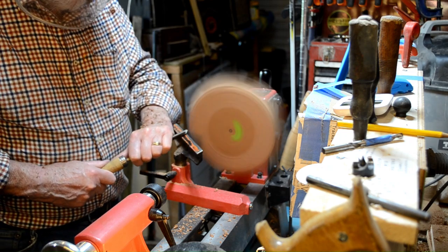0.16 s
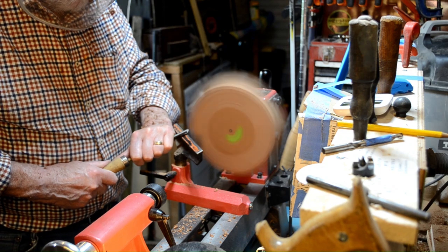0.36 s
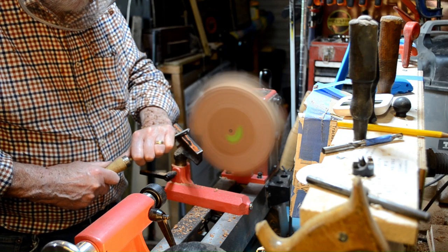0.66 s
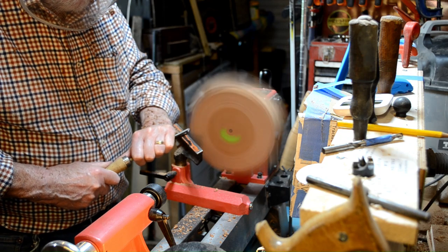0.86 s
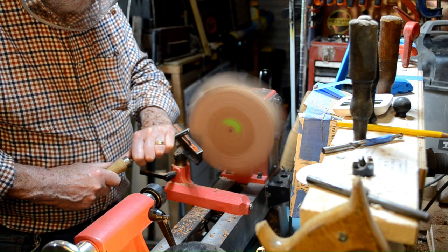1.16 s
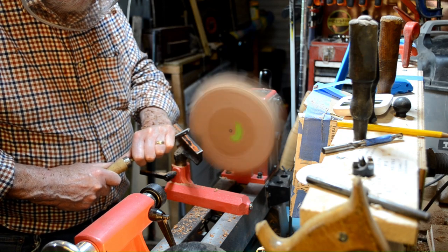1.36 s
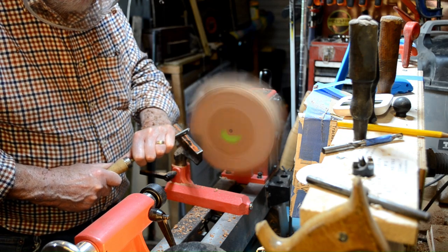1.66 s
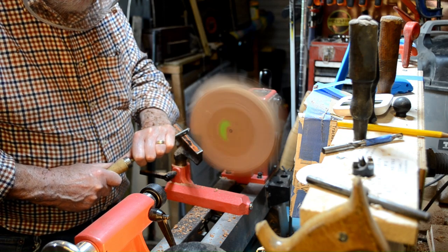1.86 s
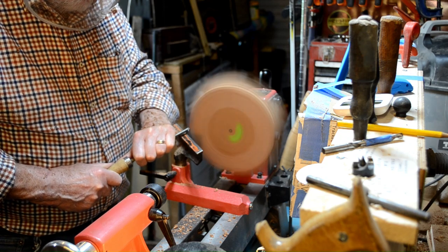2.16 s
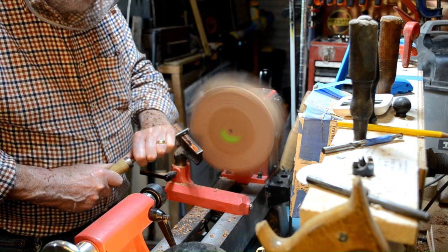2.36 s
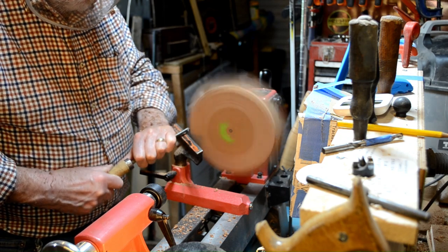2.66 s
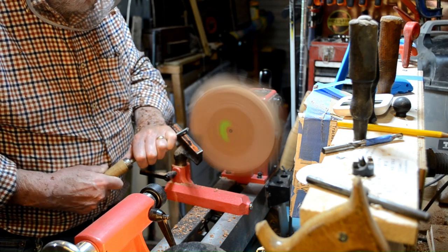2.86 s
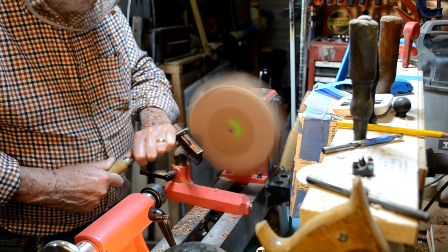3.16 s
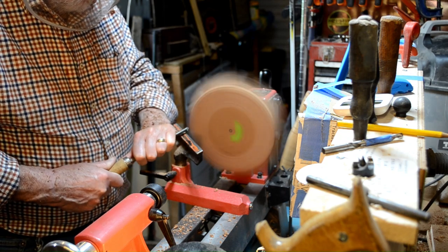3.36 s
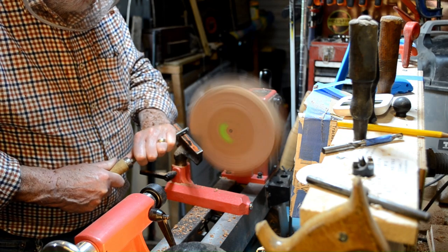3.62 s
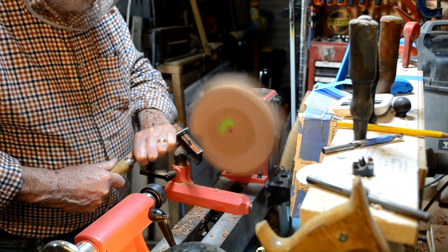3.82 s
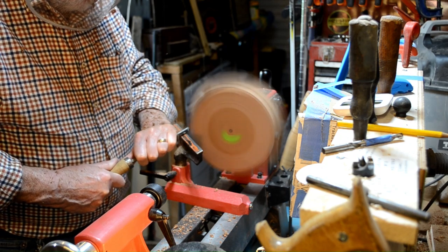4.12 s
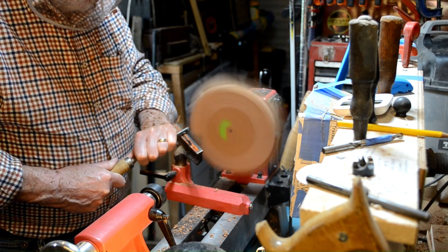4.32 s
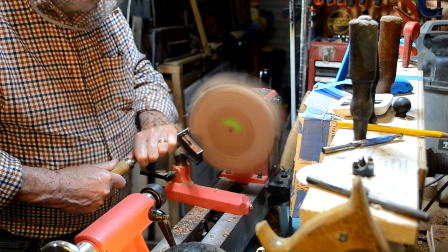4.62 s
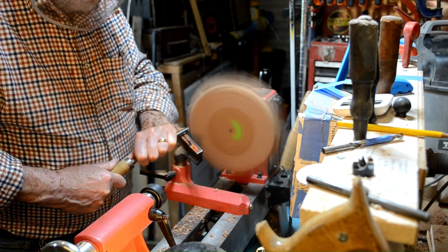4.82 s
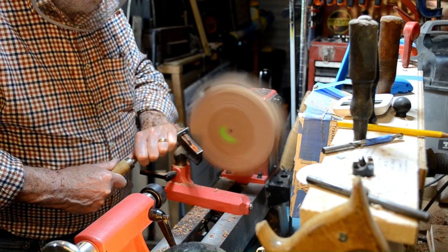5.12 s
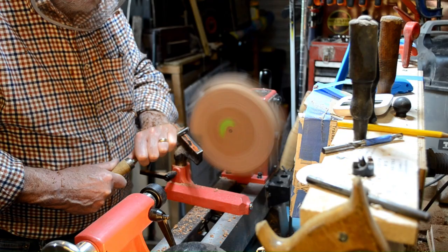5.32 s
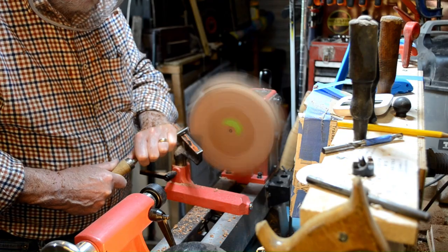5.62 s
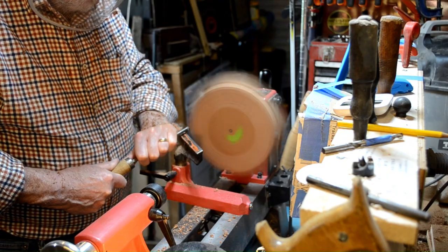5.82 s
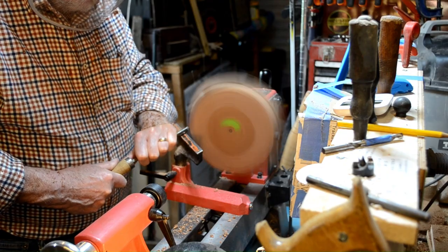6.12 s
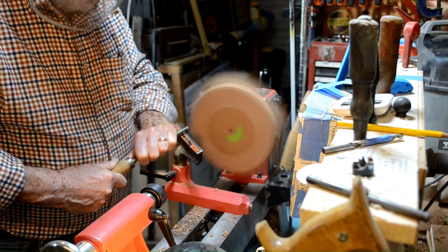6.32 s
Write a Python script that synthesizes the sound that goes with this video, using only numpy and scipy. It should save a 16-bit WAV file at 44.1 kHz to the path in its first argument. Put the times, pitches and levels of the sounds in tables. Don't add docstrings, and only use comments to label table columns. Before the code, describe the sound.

A lathe motor idles for the first 0.7 seconds: a steady, slightly wavering electric whine with high overtones, throbbing about nine times a second over airy belt and bearing hum. From 0.7 the gouge touches, hesitant at first, then a rough rattling chatter of about thirty-five uneven knocks a second, each a dry woody rip with a brief steel ring and a hollow thump of the rest; the bench rumbles beneath and the motor pitch sags. At 2.6 it lifts and the whine rises. Just before 3.0 the edge snags and slams, a single hard clank. Faint ticks from 3.3 grow into full cutting by 3.8. Around 4.6 bites drop out, a loud knot cracks at 4.7, and the motor surges. From 4.9 cutting returns, growing heavier and louder until the end at about 6.5. Close microphone, short workshop echo, slight overload on peaks.

```python
import sys
import numpy as np
from scipy import signal
from scipy.fft import rfft, irfft, next_fast_len
from scipy.io import wavfile
from scipy.ndimage import uniform_filter1d

SR = 44100
rng = np.random.default_rng(int(sys.argv[2]) if len(sys.argv) > 2 else 0)


def waveform_to_disk(signal):
    frames = np.transpose(np.atleast_2d(signal))
    scaled = np.clip(frames, -1, 1) * 32767
    samples = np.round(scaled).astype(np.int16)
    wavfile.write(sys.argv[1], SR, samples)


def attenuation_scalar(level_db):
    decades = np.asarray(level_db, float) / 20
    return 10 ** decades


N = 285723


def evened(x):
    return x / np.sqrt(np.mean(x ** 2) + 1e-20)


def read(points, hz):
    f, value = np.transpose(points)
    return np.interp(np.log(hz + 1), np.log(f + 1), value)


def coloured(points):
    size = next_fast_len(N)
    spectrum = rfft(rng.standard_normal(size))
    shape = attenuation_scalar(read(points, np.fft.rfftfreq(size, 1 / SR)))
    return evened(irfft(spectrum * shape, size)[:N])


def drift(seconds):
    step = max(int(seconds * SR / 8), 1)
    coarse = rng.standard_normal(N // step + 2)
    coarse = uniform_filter1d(uniform_filter1d(coarse, size=8), size=8)
    return evened(np.interp(np.arange(N) / step, np.arange(len(coarse)), coarse))


def resonate(x, hz, width_hz):
    pole = np.exp((2j * np.pi * hz - np.pi * width_hz) / SR)
    return 2 * signal.lfilter([1 - abs(pole)], [1, -pole], x).real


def dulled(x):
    return signal.sosfilt(signal.butter(4, 9500, fs=SR, output="sos"), x)


def ragged(x, patchy_db):
    z = signal.stft(x, nperseg=256)[2]
    patches = uniform_filter1d(rng.standard_normal(z.shape), size=4, axis=0)
    patches = evened(uniform_filter1d(patches, size=4, axis=1))
    return signal.istft(z * attenuation_scalar(patchy_db * patches), nperseg=256)[1][:N]


def envelope(bites, level_db, lag_ms, fall_ms, hold_ms=0.):
    t_ms = np.arange(SR // 7) / SR * 1000
    power = np.zeros(N + len(t_ms))
    for (s, *_, entry_ms), db in zip(bites, level_db):
        contact_ms = 3.92 + 2.27 * entry_ms + hold_ms
        swell = 1 - np.exp(-(t_ms / (entry_ms + lag_ms)) ** 1.62)
        fade = np.exp(-np.maximum(t_ms - contact_ms, 0) / fall_ms - t_ms / (3 * contact_ms))
        touch_s = s - 1.21 * entry_ms / 1000
        power[round(touch_s * SR):][:len(t_ms)] += (attenuation_scalar(db) * swell * fade) ** 2
    return np.sqrt(power[:N])


# f/Hz, t60/s
SHOP_T60 = [(100, 0.79), (300, 0.35), (1000, 0.2), (4000, 0.15), (12000, 0.12)]


def shop(x):
    taps = np.zeros(SR // 2)
    at = np.arange(200, SR // 2 - 20, 20)
    taps[at + rng.integers(0, 20, len(at))] = rng.choice([-1., 1.], len(at))
    hz, t, z = signal.stft(taps, SR, nperseg=256)
    decay = attenuation_scalar(-60 * t / read(SHOP_T60, hz)[:, None])
    tail = signal.istft(z * decay, SR, nperseg=256)[1]
    return signal.fftconvolve(x, tail / np.linalg.norm(tail))[:N]


# t/s, f/Hz
MOTOR_HZ = [(0, 662), (.7, 663), (1.1, 640), (2.55, 635), (2.68, 680), (2.75, 684), (2.98, 670),
            (3.03, 640), (3.18, 666), (3.3, 668), (3.6, 655), (3.78, 660), (4.0, 625), (4.72, 625),
            (4.84, 680), (4.93, 692), (5.1, 640), (6.48, 635)]
WHINE_ORDERS = [1.5, 6.935, *range(1, 17)]
WHINE_LEVELS_DB = [-57, -58, -62.5, -56.5, -62.5, -65, -76, -63.5, -52, -56, -64, -55, -71, -73, -88.5, -74,
                   -75, -81]
# f/Hz, density/dB per Hz
HUM_SPECTRUM = [(30, 1), (100, -5), (160, -13), (280, 4), (450, -12), (1000, -1), (1500, -7), (2500, -11),
                (3500, -17.5), (4700, -9.5), (6200, -15), (7500, -11), (8500, -22.5), (11000, -32)]


def motor():
    t = np.arange(N) / SR
    spindle_hz, idle_hz, db_per_hz = 9.6, 662, 0.16
    hz = uniform_filter1d(np.interp(t, *np.transpose(MOTOR_HZ)), 1500)
    turns = np.cumsum(hz * (1 + 0.0009 * drift(0.017))) / SR
    whine = np.zeros(N)
    for order, order_db in zip(WHINE_ORDERS, WHINE_LEVELS_DB):
        throb_db = 1.5 * np.sin(2 * np.pi * (spindle_hz * t + rng.random()))
        level = attenuation_scalar(order_db + throb_db + 1.2 * drift(0.03))
        if order in (1.5, 2):
            level = level * attenuation_scalar(4 * np.cos(2 * np.pi * spindle_hz * (t - 0.37)))
        sparking = 1 + 0.2 * drift(0.002)
        tone = np.sqrt(2) * np.sin(2 * np.pi * (order * turns + rng.random()))
        whine += level * sparking * tone
    hum = attenuation_scalar(-48.5 + 0.38 * drift(0.049)) * coloured(HUM_SPECTRUM)
    return attenuation_scalar(db_per_hz * (hz - idle_hz)) * whine + hum


# f/Hz, width/Hz, level/dB
BENCH = [(33, 7, -13), (54, 12, -13), (75, 12, 1), (100, 7, 2)]


def bench(bites):
    _, tear_db, rest_db, *_ = bites.T
    idle_db, settle_s, load_power = -63.5, 0.07, 1.07
    load_db = -23 + 2 * np.arange(N) / SR
    settle = np.exp(-1 / (settle_s * SR))
    load = envelope(bites, tear_db + rest_db, 10.2, 23.0) ** 2
    load = signal.lfilter([(1 - settle) ** 2], [1, -2 * settle, settle ** 2], load)
    push = envelope(bites, 0.2 * tear_db, 1.35, 2.3)
    push = (push - uniform_filter1d(push, size=3000)) / (uniform_filter1d(push, size=9000) + 0.056)
    force = evened(push) + attenuation_scalar(16) * rng.standard_normal(N)
    shake = np.zeros(N)
    for hz, width_hz, db in BENCH:
        mode = resonate(resonate(force, hz, width_hz), hz, 3 * width_hz)
        shake += attenuation_scalar(db) * evened(mode)
    power = attenuation_scalar(2 * idle_db) + attenuation_scalar(2 * load_db) * abs(load) ** load_power
    return np.sqrt(power) * evened(shake)


# f/Hz, width/Hz, level/dB
REST_MODES = [(157.2, 9.6, -16), (305, 22, -10.5), (368, 34, -17), (473, 50, -8.5), (551, 20.6, -9.5),
              (575, 88, -40), (724, 60, -16.5), (1073, 38, -17), (1217, 79, -12), (1996, 88, -14)]


def rest(bites):
    drive = envelope(bites, bites[:, 1] + bites[:, 2], 0.8, 15)
    rings = np.zeros(N)
    for hz, width_hz, db in REST_MODES:
        mode = resonate(rng.standard_normal(N) * drive, hz, width_hz)
        rings += attenuation_scalar(db) * mode / np.sqrt(width_hz)
    return attenuation_scalar(33.5) * dulled(rings)


def rest_ring(bites):
    rest_hz, kick_rad = 266, 0.8
    wander = 0.017 * drift(0.03)
    swing = envelope(bites, bites[:, 1] + bites[:, 2], 10.5, 15.5, hold_ms=9.5)
    kicks = np.zeros(N)
    kicks[(bites[:, 0] * SR).astype(int)] = kick_rad * rng.standard_normal(len(bites))
    step = uniform_filter1d(np.cumsum(kicks), size=450)
    phase = 2 * np.pi * np.cumsum(rest_hz * (1 + wander)) / SR
    return attenuation_scalar(4.2) * swing * np.sin(phase + step)


# f/Hz, level/dB, t60/s
SLAM_MODES = [(262, -11, .25), (473, -22, 0.05), (588, -13.5, 0.05), (736, -22, 0.06), (954, -27.5, 0.12),
              (1890, -8.5, 0.033), (2100, -21, 0.018), (2770, -24, 0.032), (3940, -20, 0.026),
              (4450, -12.5, 0.019), (5530, -28, 0.035)]


def slam():
    t = np.maximum(np.arange(N) / SR - 2.9936, 0)
    blow = np.zeros(N)
    for hz, db, t60_s in SLAM_MODES:
        rise = 1 - np.exp(-t * hz / 0.6)
        blow += rise * attenuation_scalar(db - 60 * t / t60_s) * np.sin(2 * np.pi * (hz * t + rng.random()))
    return blow


# t/s, level/dB
HAND_LEAN = [(.7, -6), (1.0, -1.5), (1.4, 1.2), (1.8, -0.5), (2.2, -2.5), (2.55, 2), (3.3, -4.5),
             (3.6, -0.7), (3.9, -1), (4.25, 2), (4.6, 1), (4.8, -5.5), (5.1, -0.5), (5.4, -1.8),
             (5.7, -0.8), (5.95, -0.5), (6.25, -4), (6.48, 2.5)]


def bites_of(turns, corners):
    start, tear_db = np.array(turns)[:, :1], np.array(turns)[:, 1:]
    place, rest_db, ring_db, fizz_db = np.transpose(corners)
    last_turn_s, late_ms_per_db, pull_most_db = 0.111, 0.32, 6
    length = np.diff(start, axis=0, append=start[-1:] + last_turn_s)
    under_db = tear_db.max(axis=1, keepdims=True) - tear_db
    s = start + place * length + late_ms_per_db * np.minimum(under_db, 20) / 1000
    rest_db = np.minimum(rest_db + 0.37 * under_db, pull_most_db)
    rest_db = rest_db + np.interp(s, *np.transpose(HAND_LEAN))
    ring_db = np.minimum(ring_db + 0.36 * under_db, pull_most_db)
    fizz_db = fizz_db + 0.2 * (tear_db + 12)
    columns = np.broadcast_arrays(s, tear_db, rest_db, ring_db, fizz_db, 3.72)
    rows = np.stack(columns, axis=-1).reshape(-1, 6)
    return rows[rows[:, 0] < N / SR]


# t/s, tear level/dB of corners 1-4 (-60: misses)
FIRST_TURNS = [(.708, -20, -13, -20.5, -27.5), (.815, -34, -21, -13.5, -37), (.919, -25, -21, -7.5, -21),
               (1.033, -14.5, -17.5, -11.5, -18), (1.148, -18.5, -22, -14.5, -16.5),
               (1.260, -13, -17, -12, -15), (1.373, -12, -9.5, -11, -14), (1.491, -12.5, -12, -12.5, -15),
               (1.607, -10.5, -16, -13.5, -15), (1.721, -10.5, -12.5, -16, -23), (1.833, -10, -9, -8, -17),
               (1.948, -11.5, -16.5, -6, -16.5), (2.066, -9, -18.5, -13.5, -20),
               (2.181, -9, -17, -17, -16.5), (2.291, -18, -7, -33, -15), (2.404, -12, -7.5, -9, -23),
               (2.520, -16.5, -9, -14, -25)]
SECOND_TURNS = [(3.268, -58, -35, -30, -57), (3.374, -60, -33.5, -32, -60), (3.479, -49, -20.5, -13.5, -60),
                (3.586, -58, -11, -7, -60), (3.699, -60, -41, -24, -21.5), (3.803, -20.5, -17, -5.5, -18.5),
                (3.925, -10.5, -12, -5.5, -22), (4.043, -11, -12.5, -5.5, -17.5),
                (4.161, -14.5, -11.5, -8.5, -21), (4.274, -13.5, -17, -9, -18.5),
                (4.389, -14, -22.5, -5.5, -21), (4.506, -11, -28, -7, -10.5), (4.625, -60, -60, -60, -19),
                (4.741, -15.5, -42, -13.5, -27)]
THIRD_TURNS = [(4.847, -37, -27.5, -30, -22.5), (4.954, -14.5, -14, -42, -13.5),
               (5.062, -45, -18, -17, -13.5), (5.174, -12, -12, -42, -15),
               (5.286, -16.5, -12.5, -34, -16.5), (5.397, -13.5, -14, -6.5, -15.5),
               (5.514, -8, -10.5, -45, -26), (5.628, -25, -13, -7, -15), (5.740, -4, -18.5, -7, -19),
               (5.865, -10, -8, -23, -8.5), (5.983, -7, -9, -6.5, -23), (6.102, -9.5, -10.5, -5.5, -14),
               (6.221, -7, -11.5, -2.5, -17), (6.340, -6.5, -22, -5.5, -12), (6.458, -7.5, -60, -60, -60)]
# place/turn, rest, ring, fizz level/dB re tear
FIRST_GRAIN = [(0, -2.5, -11.5, -16), (.24, -7, -2.5, -28), (.505, -7.5, -9, -21.5), (.75, -1, -6, -19.5)]
SECOND_GRAIN = [(0, -4.5, -7.5, -18.5), (.24, -3, -0.5, -37), (.505, -6, -8, -20.5), (.75, 0.5, -5, -31)]
THIRD_GRAIN = [(0, -10, -11, -21.5), (.235, 0.5, 0.5, -31), (.505, -10, -11, -24.5), (.75, -3.5, -6.5, -29)]
# t/s, tear level/dB, rest, ring, fizz level/dB re tear
CATCH_BITES = [
    (2.9743, -20.5, 0, -1, -28),
    (2.9918, -9.5, 7, -1, -25),
]
KNOT_BITE = (4.685, -1.5, -11, -12, -16)


def all_bites():
    first = bites_of(FIRST_TURNS, FIRST_GRAIN)
    second = bites_of(SECOND_TURNS, SECOND_GRAIN)
    third = bites_of(THIRD_TURNS, THIRD_GRAIN)
    catch = [(*row, 0.57) for row in CATCH_BITES]
    knot = [(*KNOT_BITE, 3.72)]
    return np.vstack([first, second, third, catch, knot])


# f/Hz, density/dB per Hz
TEAR_SPECTRUM = [(100, -30.5), (200, -9.5), (350, -7), (900, -18.5), (2000, -12.5), (3500, -15.5),
                 (5000, -20), (7000, -35), (9000, -50), (12000, -70)]
# f/Hz, density/dB per Hz
FIZZ_SPECTRUM = [(3000, -17), (6000, 12), (8000, 2), (9500, -3), (11800, -1), (12700, -16), (14500, -8.5),
                 (15700, -31)]
# f/Hz, width/Hz, level/dB
GOUGE_MODES = [(1360.6, 32, 5.5), (1652, 89, -2.5), (1975, 146, -9.5), (2258, 36, -9), (2723, 12, -9),
               (2966, 10, -14.5), (3580, 57, -13.5), (4040, 75, -6.5), (4530, 330, -9.5), (4860, 117, -15),
               (5580, 390, -48), (5640, 11, -43), (5472, 74, -45.5), (6020, 52, -17), (6730, 110, -28),
               (8440, 16.7, -29), (8580, 22, -30), (9270, 74, -56.5)]


def gouge(bites):
    _, tear_db, _, ring_db, fizz_db, _ = bites.T
    clumps = attenuation_scalar(2.12 * drift(0.0015))
    tear = attenuation_scalar(-11.5) * coloured(TEAR_SPECTRUM) * envelope(bites, tear_db, 0.44, 6.8)
    fizz = attenuation_scalar(-1.5) * coloured(FIZZ_SPECTRUM) * envelope(bites, tear_db + fizz_db, -0.18, 11.5)
    low_drive = clumps * envelope(bites, tear_db + ring_db, 0.4, 12.4)
    high_drive = clumps * envelope(bites, tear_db, 0.8, 1.25)
    low, high = np.zeros(N), np.zeros(N)
    for hz, width_hz, db in GOUGE_MODES:
        is_low = hz < 1750
        drive, patchy_db = (low_drive, 1.8) if is_low else (high_drive, 3.6)
        grip = attenuation_scalar(db + patchy_db * drift(0.012))
        damped_hz = width_hz + hz / 60
        mode = resonate(rng.standard_normal(N) * drive * grip, hz, damped_hz) / np.sqrt(damped_hz)
        if is_low:
            low += mode
        else:
            high += mode
    chips = ragged(tear + fizz, patchy_db=3.2) * clumps
    return chips + dulled(attenuation_scalar(27) * low + attenuation_scalar(30) * ragged(high, patchy_db=2.2))


def scene():
    bites = all_bites()
    cutting = gouge(bites) + rest(bites) + slam()
    ring = rest_ring(bites)
    echoes = shop(attenuation_scalar(-4.5) * cutting + attenuation_scalar(-19) * ring)
    null = signal.iirnotch(124, 2.5, SR)
    heard = signal.lfilter(*null, cutting + ring + echoes)
    return (heard + bench(bites) + motor())[None]


def top_cut(x):
    return signal.sosfilt(signal.butter(12, 15710, fs=SR, output="sos"), x)


def record(dry):
    overloaded = 1.28 * np.tanh(dry / 1.27)
    lowpass = signal.firwin(511, 15700, window=("kaiser", 9), fs=SR)
    limited = signal.oaconvolve(overloaded, lowpass[None], "same")
    return top_cut(limited)


dry = scene()
out = record(dry)
waveform_to_disk(out)
```